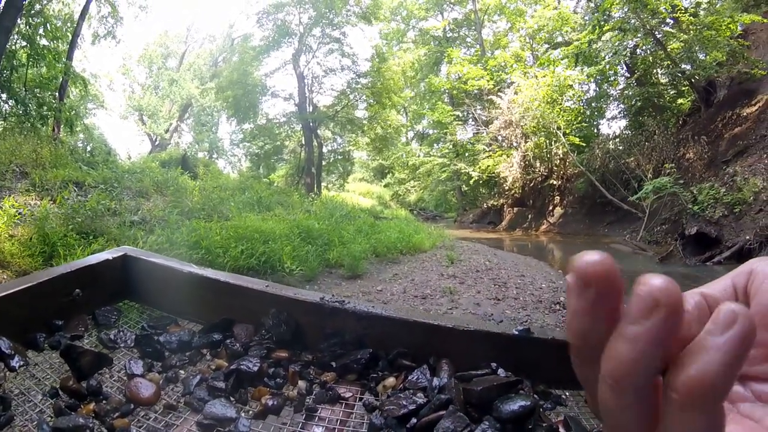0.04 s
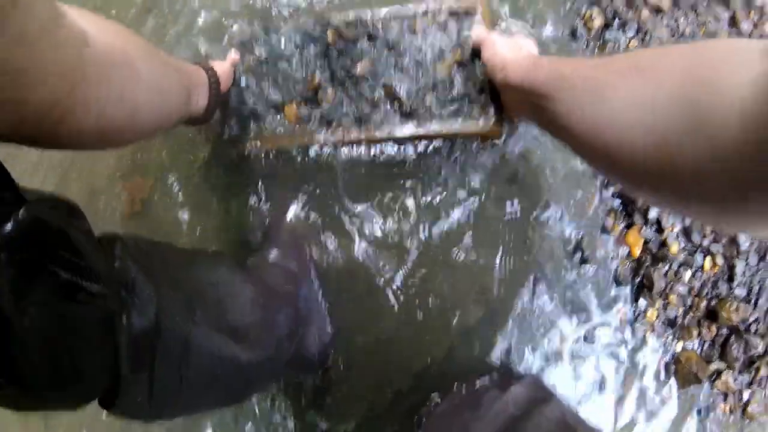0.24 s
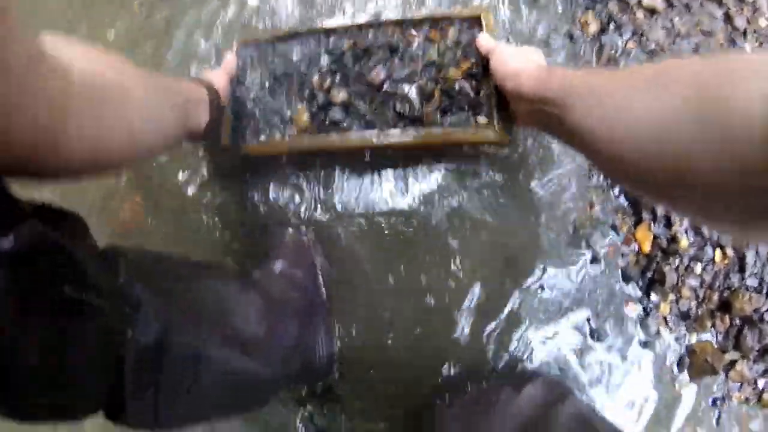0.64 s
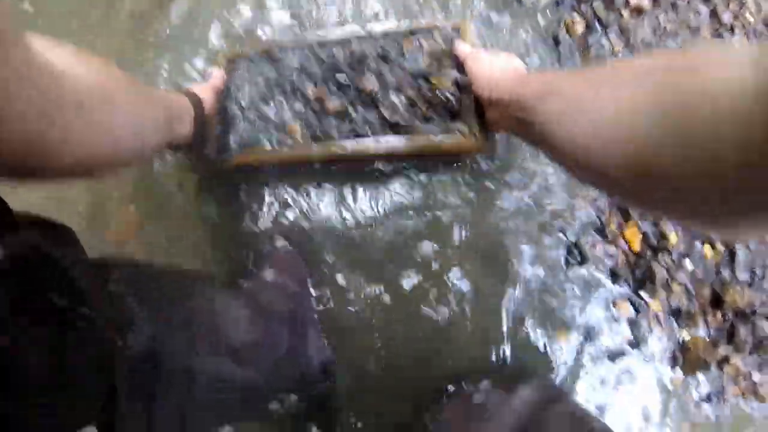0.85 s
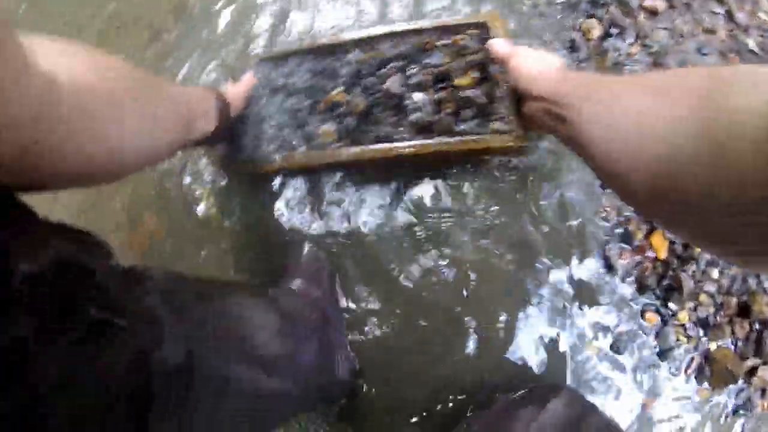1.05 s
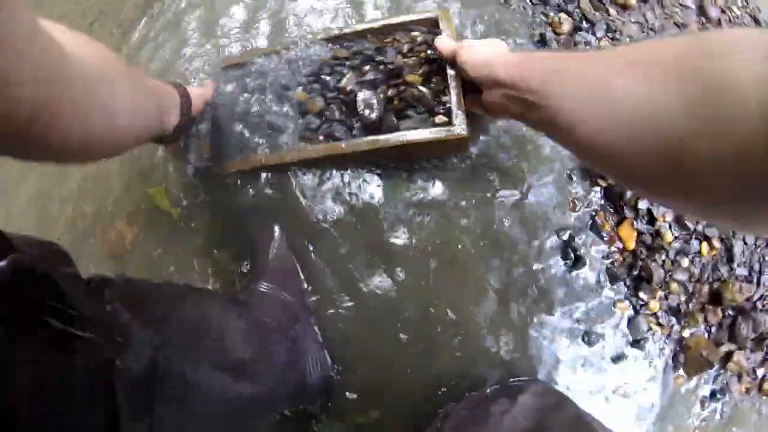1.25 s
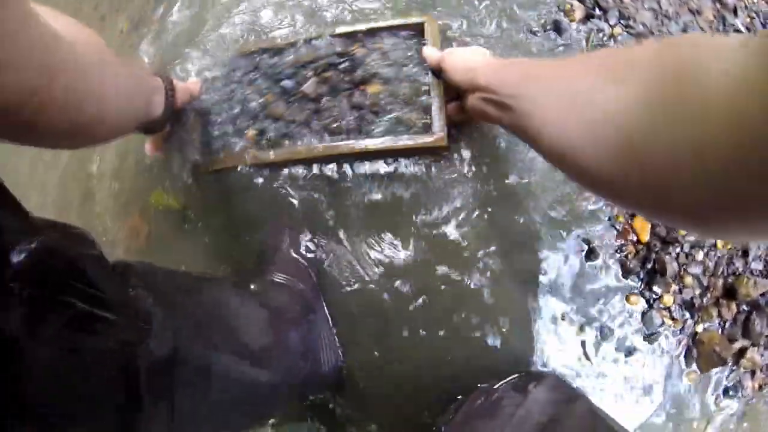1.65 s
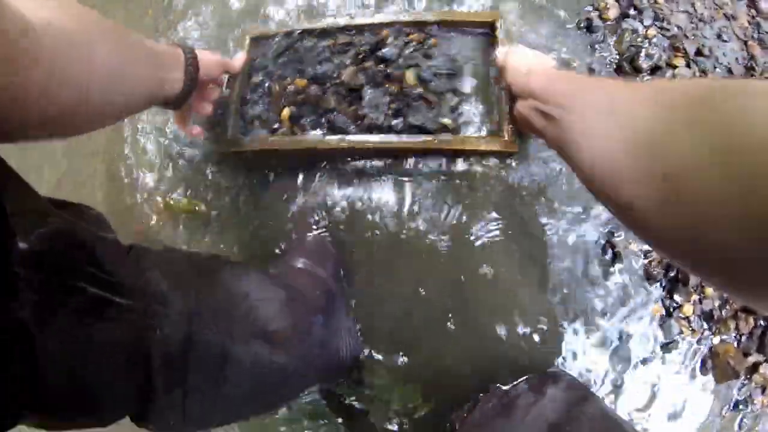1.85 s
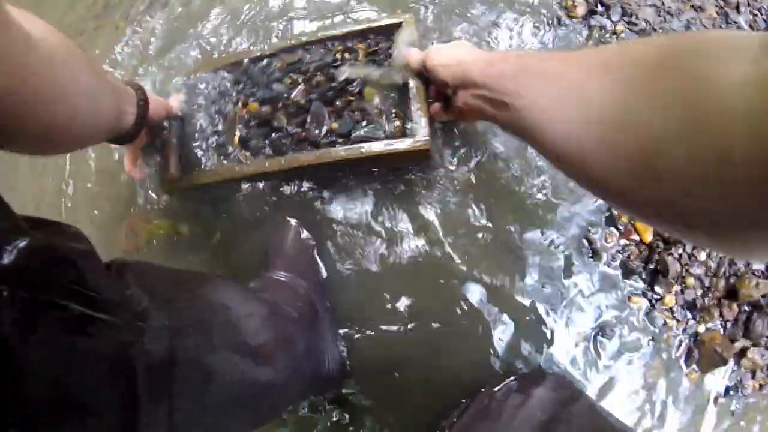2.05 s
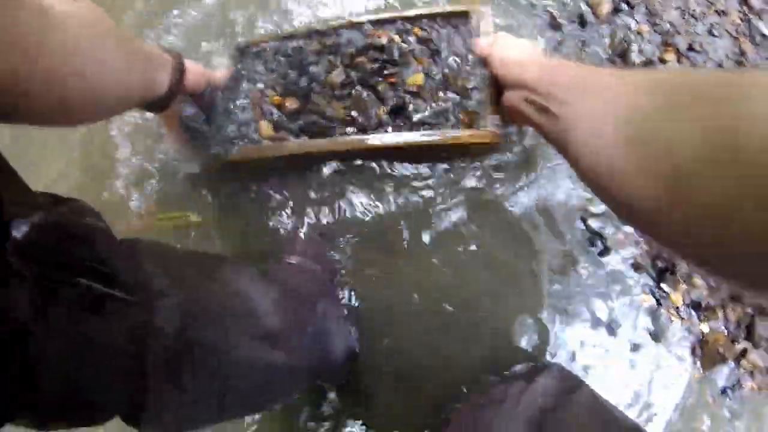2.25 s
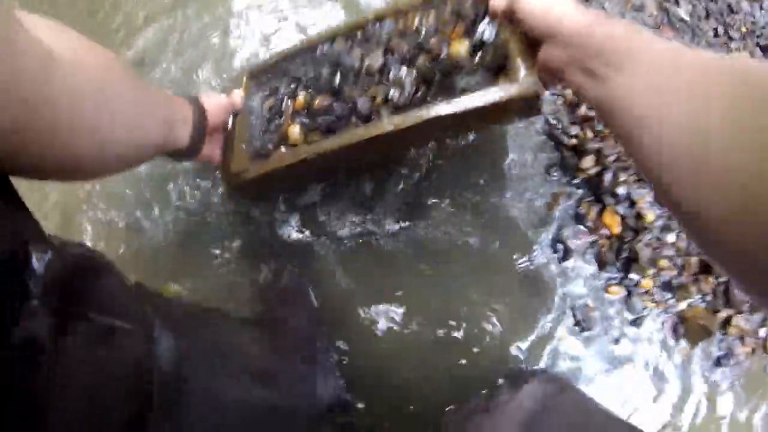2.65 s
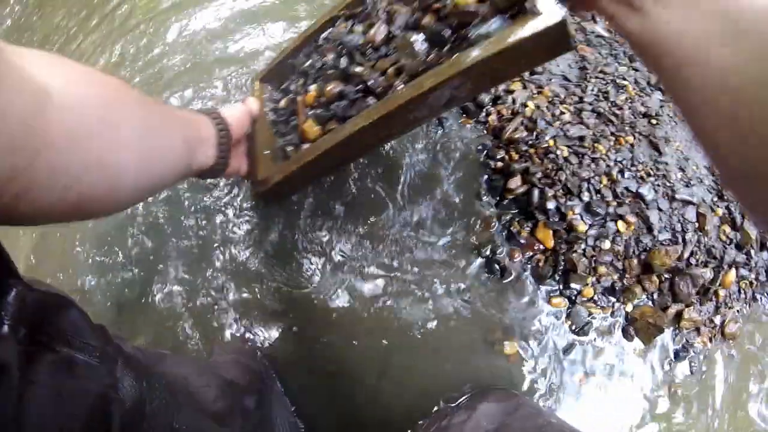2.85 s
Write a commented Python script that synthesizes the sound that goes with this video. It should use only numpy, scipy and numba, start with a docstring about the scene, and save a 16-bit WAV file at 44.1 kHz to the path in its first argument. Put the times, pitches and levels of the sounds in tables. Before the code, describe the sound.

Wet gravel rattles in a wooden sieve shaken in a shallow stream, heard at arm's length. Quick hard strokes give way to slower swirls, with stones clacking and water bubbling, then the shaking stops and the sieve drains faintly.

```python
"""Sieving gravel in a stream

Wet gravel is shaken to and fro in a wooden sieve held in a shallow stream: quick hard strokes, then
slower swirls, then a lift. On each stroke the pebbles slide and collide by the thousand, rumble on the
mesh and frame, and churn the water into bubbles. The sieve drains at the end; the stream and a low
outdoor rumble lie underneath."""
import sys
import numpy as np
from scipy import signal
from scipy.fft import rfft, irfft, next_fast_len
from scipy.io import wavfile
from numba import njit

SR = 44100
rng = np.random.default_rng(int(sys.argv[2]) if len(sys.argv) > 2 else 0)


def bounce(signal):
    """Save signal as a 16-bit WAV file at the path given by the first command-line argument."""
    frames = np.transpose(np.atleast_2d(signal))
    limited = np.clip(frames, -1, 1)
    pcm = np.round(limited * 32767).astype(np.int16)
    wavfile.write(sys.argv[1], SR, pcm)


N = 127890


def undb(db):
    """Turn decibels into a number to multiply by."""
    return 10 ** (np.asarray(db) / 20)


def unit(x):
    """Scale a sound so its average level (rms) is 1."""
    return x / np.sqrt(np.mean(x ** 2) + 1e-18)


def colour(x, points):
    """Shape the bass and treble along a curve of (pitch_hz, level_db) points."""
    point_hz, point_db = np.array(points, float).T
    size = 2 * next_fast_len(N)
    hz = np.maximum(np.fft.rfftfreq(size, 1 / SR), 1)
    gain = undb(np.interp(np.log(hz), np.log(point_hz), point_db))
    cepstrum = irfft(np.log(gain))
    cepstrum[1:size // 2] *= 2  # folded so the filter rings after a hit, never before
    cepstrum[size // 2 + 1:] = 0
    return irfft(rfft(x, size) * np.exp(rfft(cepstrum)))[:N]


@njit
def rings(start_s, hz, ring_s, size, glide):
    """Short tones that fade 60 dB in ring_s; a glide of 0.1 lifts their pitch by a tenth meanwhile."""
    out = np.zeros(N)
    for k in range(len(start_s)):
        first, n = int(start_s[k] * SR), int(ring_s[k] * SR) + 2
        tone = size[k] + 0j
        step = np.exp(2j * np.pi * hz[k] / SR - np.log(1000) / n)
        bend = np.exp(2j * np.pi * hz[k] * glide / SR / n)
        for i in range(max(first, 0), min(first + n, N)):
            out[i] += tone.imag
            tone *= step
            step *= bend
    return out


def grains(force, per_s, lo_hz, hi_hz, cycles, spread_db, glide=0.):
    """Many tiny random rings: more force makes them both more frequent and louder."""
    when, pitch, size, length = rng.random((int(per_s * N / SR), 4)).T
    start_s = np.interp(when, np.cumsum(force) / np.sum(force), np.arange(N) / SR)
    hz = np.minimum(lo_hz + (hi_hz - lo_hz) * pitch ** 2, SR / 2 - 1)
    ring_s = cycles * 2 ** (2 * length - 1) / hz
    strength = undb(-spread_db * np.log(size + .02))  # many weak, a few strong
    strength *= np.sqrt(force[(start_s * SR).astype(int)] * hz * (pitch + .1))
    return unit(rings(start_s, hz, ring_s, strength, glide)) * np.sqrt(np.mean(force ** 2))


# The tone of the stream and the outdoor air. Columns: pitch_hz, level_db
STREAM_TONE = [(20, -2.5), (30, -3.5), (60, -7), (110, -10.5), (180, -12), (300, -18), (600, -22),
               (1200, -27.5), (3000, -28), (6000, -31), (9000, -30), (13000, -38)]


def stream():
    """The stream washes steadily over a low rumble, with faint ripples."""
    ripples = grains(np.ones(N), per_s=120, lo_hz=400, hi_hz=5000, cycles=16, spread_db=4, glide=.2)
    wash = unit(colour(rng.standard_normal(N), STREAM_TONE))
    return undb(-46) * wash + undb(-64) * ripples


def water(t, force):
    """Each push churns up bubbles and a deep surge; at the end the lifted sieve trickles."""
    bubbles = grains(force, per_s=130, lo_hz=418, hi_hz=1693, cycles=21, spread_db=2.5, glide=.33)
    surge_tone = [(20, -1), (70, -3), (150, 2), (260, -2.5), (600, -30)]
    surge = force * unit(colour(rng.standard_normal(N), surge_tone))
    draining = np.interp(t, [2.5, 2.64, 2.9], [0, 1.2, .7]) + 1e-9
    trickle = grains(draining, per_s=200, lo_hz=1700, hi_hz=8500, cycles=14, spread_db=3, glide=.15)
    trickle = colour(trickle, [(800, 3), (2400, 1.5), (5000, 0), (10000, 0)])
    return undb(-7.5) * bubbles + undb(-8) * surge + undb(-48) * trickle


# The notes at which the loaded frame and mesh ring. Columns: pitch_hz, width_hz, level_db
FRAME_NOTES = [(176, 120, -5.5), (380, 81, -15), (475, 104, 5), (730, 260, -2.5)]


def frame_rumble(force):
    """Stones thud on the mesh and ring the wet wooden frame."""
    thuds = grains(force, per_s=900, lo_hz=300, hi_hz=2520, cycles=2, spread_db=3.5)
    wood = sum(undb(db) * signal.lfilter(*signal.iirpeak(hz, hz / width_hz, fs=SR), thuds)
               for hz, width_hz, db in FRAME_NOTES)
    muffled = signal.sosfilt(signal.butter(2, 1300, fs=SR, output="sos"), wood)
    return undb(-1.5) * unit(muffled) * np.sqrt(np.mean(force ** 2))


# Big bubbles in the water. Columns: start_s, level_db, pitch_hz, ring_s
BIG_BUBBLES = [(.103, -34, 202, 0.097), (.238, -29, 239.3, 0.054), (.364, -23.5, 353, 0.074),
               (.529, -31, 184, 0.081), (.600, -29, 500, 0.055), (0.998, -28.5, 181, .08),
               (1.168, -28.5, 466, 0.044), (1.319, -32.5, 164, 0.097), (1.705, -31, 900, 0.034),
               (1.748, -22.5, 880, 0.052), (1.769, -26.5, 896, .05), (2.092, -27.5, 864, 0.045),
               (2.111, -30.5, 457, .04), (2.439, -21, 1250, 0.04), (2.460, -31, 467, 0.074),
               (2.491, -24.5, 445, 0.042), (2.530, -27.5, 390, 0.12), (2.739, -34, 770, 0.042)]


def plops():
    """Big bubbles ring, each shed three quieter ones, and flutter in the churned water."""
    split_s, split_octaves, flutter_depth, flutter_hz = .02, .35, .37, 131
    start_s, db, hz, ring_s = np.array(BIG_BUBBLES, float).T.copy()
    tones = rings(start_s, hz, ring_s, undb(db), glide=.18)
    tones -= rings(start_s, hz, ring_s / 10, undb(db), glide=.014)  # softens each start
    for late, detune in rng.uniform(size=(len(start_s), 3, 2)).transpose(1, 2, 0):
        shed_hz = hz * 2 ** (split_octaves * (2 * detune - 1))
        tones += rings(start_s + split_s * late, shed_hz, ring_s / 2, undb(db - 11.5), glide=.13)
    smooth = signal.butter(2, flutter_hz, fs=SR, output="sos")
    swell, turn = (unit(signal.sosfilt(smooth, rng.standard_normal(N))) for _ in range(2))
    flutter = 1 + flutter_depth * (swell + 1j * turn)  # wobbles both loudness and pitch
    return np.real(signal.hilbert(tones) * flutter) / np.sqrt(1 + 2 * flutter_depth ** 2)


# Hard knocks: mostly single stones striking, the first one the sieve slapping the water. Columns: start_s,
# level_db, pitch_hz
HARD_KNOCKS = [(0.2364, -23, 2630), (0.245, -19, 3800), (.3685, -12.5, 2440), (.372, -21, 1700),
               (0.5111, -12.5, 3590), (0.515, -16, 2500), (.5225, -15.5, 2100), (0.5258, -17, 4230),
               (.7095, -15, 2600), (0.7143, -18, 4750), (.731, -17, 4400), (.892, -19, 2440),
               (1.142, -16, 1450), (1.261, -25, 2580), (1.266, -27.5, 4830), (1.285, -21, 2150),
               (1.745, -18.5, 3000), (1.812, -12, 5300), (1.817, -19, 5900), (2.023, -14, 3180),
               (2.045, -27, 4200)]
# The tones inside one such hit. Columns: pitch_ratio, ring_s, level_db, delay_s
KNOCK_TONES = [(.55, 0.0038, -14.5, 0.0043), (1, 0.01, -0.5, 0.0012), (1.55, 0.0059, -11, 0)]


def knocks():
    """Each hard knock clacks with three very short tones."""
    start_s, db, hz = np.array(HARD_KNOCKS, float).T
    return sum(rings(start_s + delay_s, hz * ratio, np.full(len(hz), ring_s), undb(db + tone_db), 0.)
               for ratio, ring_s, tone_db, delay_s in KNOCK_TONES)


# The strokes of the sieve; at start_s the stones break loose.
# Columns: start_s, peak_s, rise_s, fall_s, level_db, brightness_db, frame_and_water_db
SIEVE_STROKES = [ (.225, .278, .050, .026, -20, 1, -34.5), (.305, .372, .046, .056, -23.5, -3, -34.5),
                 (.481, .514, .026, .024, -20, .5, -38.5), (.559, .599, .039, .056, -22, -4, -40),
                 (.672, .723, .042, .027, -23.5, 3, -36), (.754, .820, .070, .040, -24.5, -2, -35),
                 (.864, .894, .028, .060, -28, -2, -37.5), (.935, 1.083, .182, .09, -28, 1.5, -44),
                 (1.128, 1.172, .06, .068, -27, -2.5, -39), (1.297, 1.401, .098, .107, -26, 2.5, -43),
                 (1.487, 1.575, .082, .105, -27.5, 1, -49), (1.700, 1.811, .122, .117, -27.5, 3.5, -43),
                 (1.900, 2, .076, .077, -20.5, 4.5, -45), (2.088, 2.194, .138, .070, -23.5, 6.5, -46),
                 (2.275, 2.332, .061, .09, -27, 3.5, -44.5), (2.345, 2.411, .061, .060, -26.5, -1.5, -40),
                 (2.465, 2.519, .037, .084, -24.5, 2, -33.5), (2.688, 2.701, .02, .035, -38.5, -4, -56)]


def shaking(t):
    """Each stroke swells and dies away, pushing on the coarse stones, the fine grit and the frame."""
    begin_s, end_s, slip_s = .235, 2.62, .014  # slip_s: time for the heap to start sliding
    # Stones keep shifting a little between strokes.
    shifting = undb(-43) * np.clip((t - begin_s) / .01, 0, 1) * np.exp(-np.maximum(t - end_s, 0) / .07)
    coarse, fine, frame = shifting ** 2, shifting ** 2, (shifting * undb(-10)) ** 2
    for start_s, peak_s, rise_s, fall_s, db, bright_db, frame_db in SIEVE_STROKES:
        from_peak_s = np.abs(t - peak_s)
        swell_db = -12 * np.where(t < peak_s, (from_peak_s / rise_s) ** 1.8, (from_peak_s / fall_s) ** 1.6)
        swell = undb(swell_db) * np.clip((t - start_s) / slip_s, 0, 1)
        coarse += (swell * undb(db - bright_db / 2)) ** 2
        fine += (swell * undb(db + bright_db / 2)) ** 2
        frame += (swell * undb(frame_db)) ** 2
    return np.sqrt(coarse), np.sqrt(fine), np.sqrt(frame)


# The tone of the clattering pebbles. Columns: pitch_hz, level_db
PEBBLE_TONE = [(100, -25), (450, -19), (620, -15), (850, -10), (1050, -4), (1300, -1.5), (1800, -1),
               (2450, 1), (3100, -2), (4800, -2), (6200, -2.5), (8000, -3.5), (10000, -9.5), (12000, -17)]


def gravel(coarse, fine):
    """Small pebbles click and larger ones clack; stones set the lower part of the sound, grit the top."""
    force = np.sqrt(coarse * fine) + 1e-9
    clicks = grains(force, per_s=14000, lo_hz=559, hi_hz=11490, cycles=15.3, spread_db=1.5)
    clacks = grains(force, per_s=600, lo_hz=1167, hi_hz=5620, cycles=17.5, spread_db=2, glide=.051)
    clatter = unit(colour(clicks + undb(-7.5) * clacks, PEBBLE_TONE)) * np.sqrt(np.mean(force ** 2))
    low = signal.sosfiltfilt(signal.butter(2, 2920, fs=SR, output="sos"), clatter)
    high = clatter - low
    return undb(-.69) * (low * coarse + high * fine) / force


def sieve_echo(x):
    """Sound bounces briefly between the walls of the sieve and the water."""
    ring_s, echo_db = .027, -11.5
    t = np.arange(SR // 8) / SR
    tail = rng.standard_normal(len(t)) * undb(-60 * t / ring_s) * (t > .001)
    tail /= np.sqrt(np.sum(tail ** 2))
    return x + undb(echo_db) * signal.fftconvolve(x, tail)[:N]


def scene():
    """The sieve in the stream, at arm's length."""
    t = np.arange(N) / SR
    coarse, fine, frame = shaking(t)
    inside = sieve_echo(gravel(coarse, fine) + knocks() + plops())
    return (inside + frame_rumble(frame) + water(t, frame) + stream())[None]


# How strongly the microphone picks up each pitch. Columns: pitch_hz, level_db
MIC_TONE = [(20, 3), (6200, 0), (6520, 4.5), (6740, -3), (6960, -6), (8000, -5.5), (14000, -13.5)]


def record(dry):
    """The microphone drops the deepest rumble, has a peak in the treble and dulls everything above it."""
    rumble_cut = signal.butter(2, 14, "high", fs=SR, output="sos")
    top_cut = signal.ellip(8, .2, 70, 11850, fs=SR, output="sos")
    heard = signal.sosfilt(rumble_cut, colour(dry[0], MIC_TONE))
    return signal.sosfilt(top_cut, heard)[None]


dry = scene()
out = record(dry)
bounce(out)
```